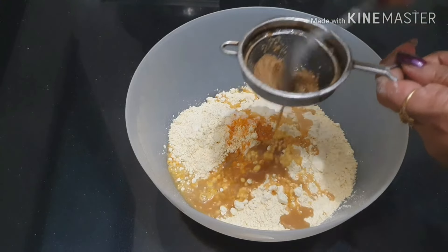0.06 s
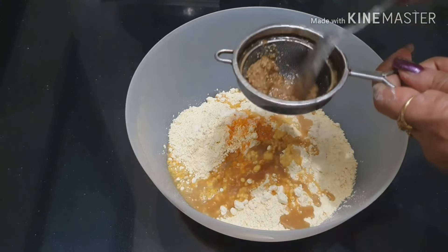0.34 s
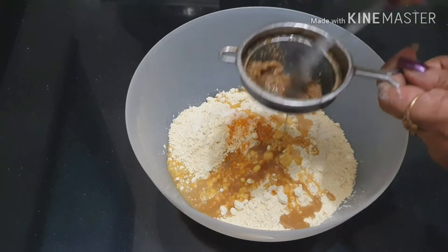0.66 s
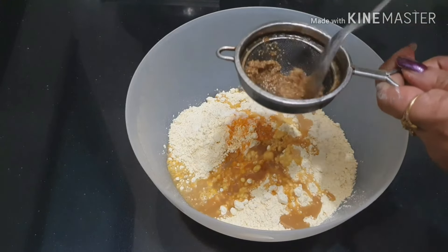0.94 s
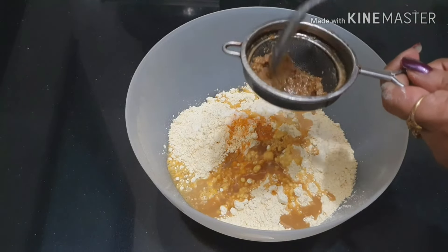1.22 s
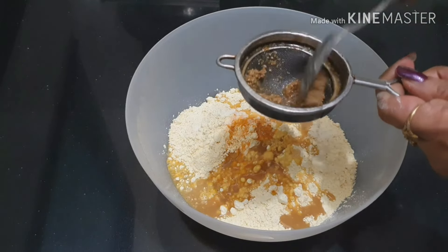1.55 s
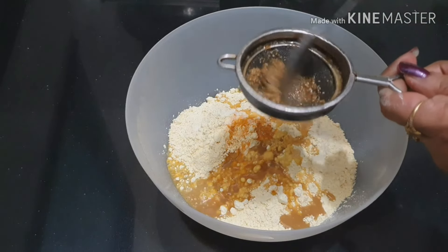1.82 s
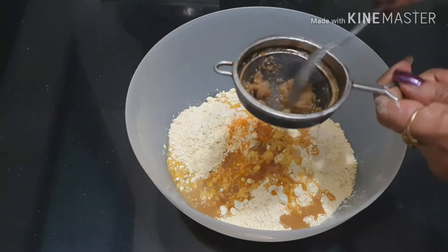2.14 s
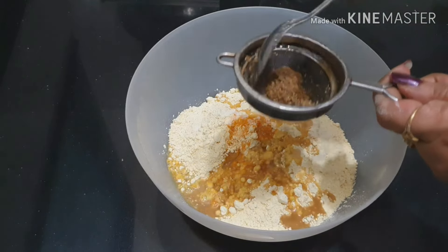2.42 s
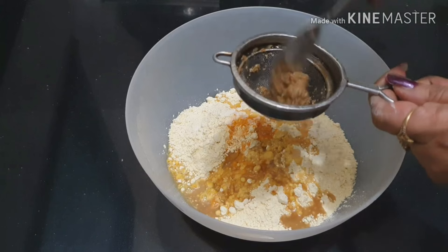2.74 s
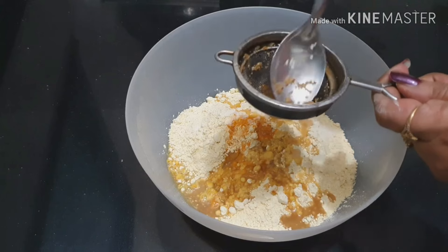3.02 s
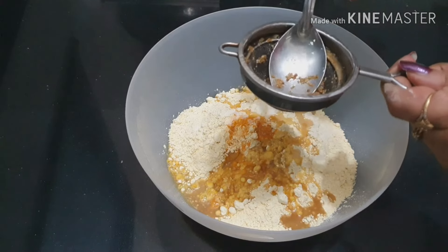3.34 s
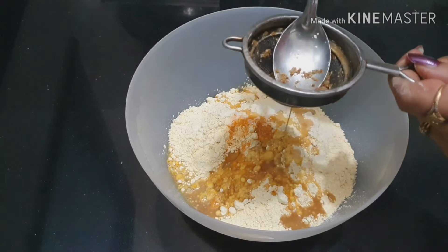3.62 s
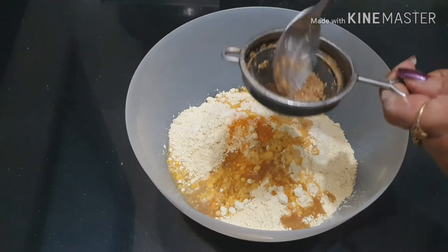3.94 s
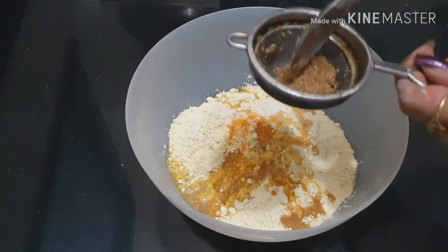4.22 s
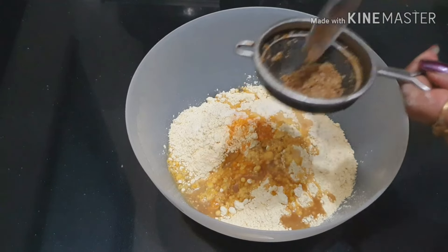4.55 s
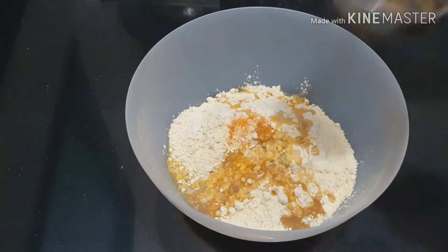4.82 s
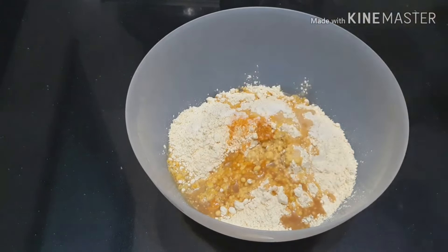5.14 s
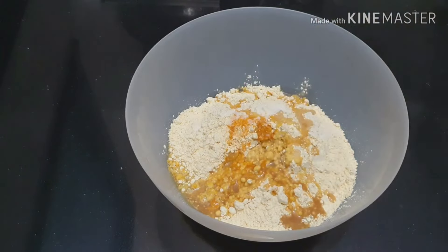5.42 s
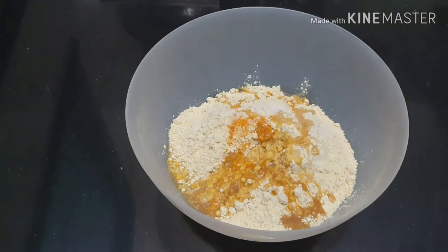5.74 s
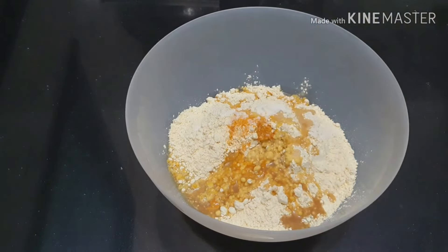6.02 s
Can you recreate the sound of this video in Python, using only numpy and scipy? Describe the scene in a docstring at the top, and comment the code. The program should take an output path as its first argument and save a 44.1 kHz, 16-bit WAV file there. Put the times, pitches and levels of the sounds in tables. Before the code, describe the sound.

A faint, low kitchen rumble and slight hiss run throughout. From the start until about 2.7 seconds, a steel spoon scrapes wet paste through a small mesh strainer in short, irregular rasps, some barely audible. Dry ticks, crackles and soft bumps of handling sound close to the microphone between 1.4 and 2.7 seconds. After a pause with only the room, the spoon taps the strainer's rim in three quick, crisp knocks with small rebounds, from 4.2 to 4.5 seconds. Faint handling follows around 5 seconds. At 5.6 seconds the strainer lands on a steel dish with a sharp clank, the loudest sound, ringing for about half a second. The spoon drops against it with a bright clink at 5.8 seconds and the strainer slides briefly, amid a cluster of close ticks and crackles ending near 6.1 seconds.

```python
"""Straining spice paste in a kitchen

A steel spoon scrapes wet paste through a small mesh strainer and is tapped clean on the rim.
The strainer is set down on a steel dish, which rings; the spoon drops against it and the strainer slides.
Dry ticks and crackles of handling sit close to the microphone, over a low room rumble."""
import sys
import numpy as np
from scipy import signal
from scipy.fft import rfft, irfft
from scipy.io import wavfile
from scipy.ndimage import uniform_filter1d

SR = 44100
rng = np.random.default_rng(int(sys.argv[2]) if len(sys.argv) > 2 else 0)


def put_to_file(sound):
    """Save the sound as 16-bit audio at rate SR, in the file named by the first command-line argument."""
    columns = np.atleast_2d(sound).T  # one column per channel
    safe = np.clip(columns, -1, 1)
    whole_steps = np.round(safe * 32767)
    wavfile.write(sys.argv[1], SR, whole_steps.astype(np.int16))


N = 276639

# Room rumble and microphone hiss. Each row: frequency in Hz, relative level in dB.
RUMBLE_COLOUR = [(20, -43.5), (29, -38.5), (38, 1), (50, 1), (90, 0.5), (160, -6), (260, -8.5), (500, -14),
                 (800, -18.5), (1100, -29), (1400, -35), (1700, -34), (2100, -53.5), (4000, -56.5)]
HISS_COLOUR = [(1000, -6.5), (2000, -1.5), (3000, -6), (4300, -6), (5100, -0.5), (9500, -1.5), (12000, -6),
               (15500, -11.5)]
# The kitchen's decay. Each row: frequency in Hz, time to fall 60 dB in seconds.
ROOM_DECAY = [(300, 0.95), (1000, 0.56), (3000, 0.45), (7000, 0.45), (14000, 0.29)]
# Reflections off counter and walls. Each row: delay in seconds, relative gain.
REFLECTIONS = [(.0021, 0.14), (.0072, .2), (.0095, 0.26), (0.0109, .25), (.015, 0.13)]
# Ticks at the microphone. Each row: start in seconds, level in dB, tilt in dB per octave.
CLOSE_TICKS = [(1.409, -40.5, -5.5), (1.4745, -25.5, -1.5), (1.579, -35.5, 4.5), (1.868, -33, -0.5),
               (1.926, -24, 6), (2.075, -46, 2), (2.543, -49, -10), (2.556, -43.5, -4.5),
               (2.582, -35, -3.5), (2.608, -39, -1), (2.636, -36, -2), (5.006, -50, -4.5),
               (5.191, -41.5, 12), (5.821, -25.5, 7), (5.845, -35, -4.5), (5.874, -33, 5),
               (5.882, -23.5, -2.5), (5.9394, -22.5, -0.5), (5.969, -30, -2), (5.988, -22.5, -4),
               (6.014, -33, 0), (6.0299, -32, 2.5), (6.036, -26.5, -1), (6.0662, -35.5, -5),
               (6.077, -35.5, -6)]
# Shifts of grip. Each row: start in seconds, length in seconds, crackle in dB, thud in dB.
GRIP_SHIFTS = [(1.437, 0.057, -60, -53.5), (1.9, 0.18, -76, -63), (2.29, 0.032, -59, -56.5),
               (2.374, 0.1, -74.5, -56), (2.46, 0.2, -65, -58), (4.857, 0.3, -72, -64.5),
               (5.127, 0.31, -80, -63.5), (5.725, .17, -51, -51.5), (5.896, 0.14, -56.5, -54)]
# Spectra of one handling tick, one blow of the spoon, one on the dish and one catch on the mesh.
# Each row: frequency in Hz, relative level in dB.
TICK_SPECTRUM = [(60, -6), (400, -7), (1000, -1), (2100, 1), (2650, -3), (3500, 3), (4400, -8), (5700, -3),
                 (6600, -5), (7500, -14.5), (8700, 0.5), (10600, -14.5), (13500, -10.5), (15500, -11)]
SPOON_CLICK = [(200, -19), (550, -20.5), (1000, -6), (1500, -2), (2700, 5), (4000, 1), (5200, -0.5),
               (7500, -7), (8800, -13), (10500, -13), (12500, -16), (15500, -15)]
LANDING_CLICK = [(200, -29.5), (700, -24), (1200, -17), (2000, 3.5), (2800, -1.5), (3500, -10), (4200, 4.5),
                 (4900, -16.5), (6200, -9.5), (7600, -20.5), (8500, -21), (9100, -32), (14000, -36.5),
                 (15200, -40.5)]
MESH_CLICK = [(150, -30), (700, 0.5), (1250, -4.5), (2050, -6.5), (2500, -5), (3300, 0.5), (4200, -0.5),
              (5100, -5.5), (6150, -18.5), (7000, -12), (9000, -19), (9650, -16), (11000, -17.5),
              (15500, -28)]
# Blows: spoon on rim, strainer on dish, spoon dropping. Each row: start in seconds, strength in dB,
# tilt in dB per octave, decay time of the contact chatter in seconds.
RIM_TAPS = [(4.1672, -22.5, -1.3, .0007), (4.2035, -33.5, -4, .0004), (4.3208, -23.5, 0, 0.00058),
            (4.3232, -22, -1.5, .0006), (4.351, -29.5, -3.5, .001), (4.3752, -32, -3, 0.0016),
            (4.5152, -18, -1.1, .001)]
DISH_LANDINGS = [(5.6102, -9.5, 0.5, 0.00099), (5.743, -32, 4, 0.00063)]
SPOON_DROPS = [(5.7685, -31, 0.5, 0.0013), (5.771, -26.5, 1.5, 0.0074), (5.853, -54, -2, 0.00086)]
# Ring of the hand-held strainer, the dish and the spoon.
# Each row: frequency in Hz, relative level in dB, time to fall 60 dB in seconds.
RIM_MODES = [(750, -17, 0.016), (1870, -31.5, 0.17), (2320, -29.5, 0.22), (2532, -9, 0.035),
             (3276, -4, 0.022), (4040, -13, 0.025), (6300, -8, 0.0094), (7700, -14, 0.024),
             (9800, -10, 0.012), (11050, -13, 0.013)]
DISH_MODES = [(1554, -34, .6), (1688, -35, .6), (1774, -35, .6), (1845, -22, .17), (2011, -22, .3),
              (2032, -29, .55), (2074, -26, .22), (2135, -28, .4), (2231, -26, .15), (2253, -21, .17),
              (2440, -31, .25), (2568, -26, .22), (2721, -31, .3), (2882, -28, .17), (3235, -33, .3),
              (3795, -40, .5), (3967, -29, .15), (4125, -32, .42), (4159, -34, .6), (4257, -28, .25),
              (4304, -34, .6), (4419, -25, .16), (5357, -26, .22), (5829, -32, .22), (6138, -27, .18),
              (6449, -37, .3), (7192, -45, .6), (9734, -31, .2), (12680, -41, .2), (14240, -41, .2)]
SPOON_MODES = [(2585, -5, .11), (3455, -16, .2), (4120, -11, .16), (4290, -12, .16), (5001, -24, .2),
               (5950, -17, .17), (7720, -18, .1), (8600, -16, .07), (9740, -17, .12), (10680, -22, .2),
               (13600, -31, .11)]
# The strainer's frame in a scrape. Each row: frequency in Hz, width in Hz, relative level in dB.
FRAME_MODES = [(1694, 170, -20), (2083, 155, -4.5), (2480, 160, -9.5), (3133, 70, -15.5), (3650, 74, -17.5),
               (3450, 97, -27), (5640, 67, -14.5), (6110, 110, -10.5), (9440, 110, -25.5), (9800, 190, -21)]
# Scrapes of the wire mesh: spoon strokes, and last the strainer sliding on the dish.
# Each row: start in seconds, rise to full pressure in seconds, level in dB,
# pitch of the rasp in Hz, its relative level in dB, tilt in dB per octave.
MESH_SCRAPES = [(-.004, 0.0083, -54.5, 2440, -5, -.5), (.092, 0.012, -59.5, 3170, 2, 1),
                (.138, .01, -59, 2160, 1, 2), (.314, 0.033, -47.5, 2900, -25, 0),
                (.662, 0.032, -44, 3630, -9, 2.5), (.732, .015, -56, 2880, 2, 2),
                (1.011, 0.025, -48, 3800, 5, 0), (1.113, 0.018, -55, 2900, 1, 1.5),
                (1.457, 0.044, -43, 3170, 2.5, .5), (1.768, 0.012, -41, 3800, 5, -.5),
                (1.818, 0.02, -47.5, 3080, 3.5, -0.5), (2.111, 0.015, -45.5, 4670, 4, 3.5),
                (2.125, 0.03, -41.5, 3260, -10, 1.5), (2.648, .002, -40.5, 3000, -3, -1.4),
                (5.85, 0.038, -43, 3700, -1, -0.5)]
# The rasp's pitch ratio at touch, at full pressure and at lift-off.
RASP_GLIDE = [1.13, 0.99, 0.86]


def amp(db):
    """Decibels to gain."""
    return 10 ** (np.asarray(db) / 20)


def unit(x):
    """Scales to an rms of one."""
    return x / np.sqrt(np.mean(x ** 2) + 1e-20)


def read(points, hz):
    """Reads a table on a log-frequency axis."""
    f, value = np.transpose(points)
    return np.interp(np.log(hz + 1), np.log(f), value)


def add(mix, start, sound):
    """Mixes a sound in at a start time in seconds."""
    at = round(start * SR)
    sound = sound[max(-at, 0):]
    part = mix[max(at, 0):][:len(sound)]
    part += sound[:len(part)]


def click(colour, tilt_db, size=2048):
    """The shortest causal pulse with a given spectrum, peak one."""
    hz = np.fft.rfftfreq(size, 1 / SR)
    octaves = np.log2(np.clip(hz, 500, 9000))
    cepstrum = irfft(np.log(amp(read(colour, hz) + tilt_db * octaves)))
    cepstrum[1:size // 2] *= 2
    cepstrum[size // 2 + 1:] = 0
    pulse = irfft(np.exp(rfft(cepstrum)))
    return pulse / abs(pulse).max()


def noise(colour):
    """Steady noise of a given spectrum, rms one."""
    gain = amp(read(colour, np.fft.rfftfreq(N, 1 / SR)))
    return unit(irfft(rfft(rng.standard_normal(N)) * gain, N))


def grains(count, per_s, spread_db):
    """Random impulses of uneven size."""
    size = amp(spread_db * np.minimum(rng.exponential(1, count), 3))
    return size * rng.choice([-1, 1], count) * (rng.random(count) < per_s / SR)


def resonate(x, hz, width_hz):
    """One resonance, steady or gliding."""
    turn = np.exp(2j * np.pi * np.cumsum(hz * np.ones(len(x))) / SR)
    return (turn * signal.lfilter([1], [1, -np.exp(-np.pi * width_hz / SR)], x / turn)).real


def room_tone():
    """The kitchen's low rumble and the microphone's own hiss."""
    return amp(-62) * noise(RUMBLE_COLOUR) + amp(-78.5) * noise(HISS_COLOUR)


def kitchen(x, echo_db, tail_db):
    """The microphone hears direct sound, near reflections, then a dense tail whose treble dies first."""
    hz, t, spectra = signal.stft(grains(SR, per_s=6000, spread_db=4), SR, nperseg=256)
    colour_db = read([(300, 6.5), (3000, -0.5), (7000, 2.5), (14000, 2.0)], hz)[:, None]
    spectra *= amp(colour_db - 60 * t / read(ROOM_DECAY, hz)[:, None])
    fade_in = np.interp(np.arange(SR) / SR, [.003, .009], [0, 1])
    tail = signal.istft(spectra, SR, nperseg=256)[1][:SR] * fade_in
    response = amp(tail_db) * tail / np.linalg.norm(tail)
    for delay, gain in REFLECTIONS:
        add(response, delay, amp(echo_db) * gain * np.array([.5, .5]))
    response[0] += 1
    return signal.fftconvolve(x, response)[:N]


def soften(x, force_db):
    """Gentle slips lack the highest treble that hard ones have."""
    hardness = np.interp(force_db, [-48, -30], [.3, 1])
    soft = signal.fftconvolve(x, signal.firwin(21, 10800, fs=SR), "same")
    return soft + hardness * (x - soft)


def ticks(hard_db=-32.5, rebound_s=.0039, rebound_db=-6.5, slip_s=.0018):
    """Stick-slip ticks close to the microphone, each trailed by tiny slips; hard ones catch twice."""
    out, t = np.zeros(N), np.arange(SR // 50) / SR
    for start, db, tilt_db in CLOSE_TICKS:
        catches = [(0, 0), (rebound_s, rebound_db)] if db > hard_db else [(0, 0)]
        for delay, drop_db in catches:
            slips = .23 * rng.standard_normal(len(t)) * np.exp(-t / slip_s)
            slips[0] = 1
            tick = signal.fftconvolve(slips, click(TICK_SPECTRUM, tilt_db))
            add(out, start + delay, -amp(db + drop_db) * soften(tick, db))
    return out


def grip_crackle(firm_db=-48.5, creep_s=.013):
    """Crackle and a soft thud swell at each tick and shift of grip; gentle crackle is sparse and dull."""
    out = np.zeros(N)
    low_noise = noise([(25, -30.5), (65, 1.0), (130, -3), (250, -14.5), (700, -23), (2000, -43.5)])
    creeps = [(start - creep_s, 2 * creep_s, db - 29, db - 30) for start, db, _ in CLOSE_TICKS]
    for start, length, db, thud_db in GRIP_SHIFTS + creeps:
        thud = unit(low_noise[round(start * SR):][:round(length * SR)])
        force_db = db - firm_db
        slips = grains(len(thud), per_s=750 * amp(.15 * force_db), spread_db=3.5)
        crackle = signal.fftconvolve(slips, click(TICK_SPECTRUM, tilt_db=.06 * force_db))[:len(thud)]
        shift = amp(db) * soften(unit(crackle), db + 12) + amp(thud_db) * thud
        add(out, start, shift * signal.windows.tukey(len(shift), .5))
    return out


def blows(rows, colour, modes, chatter, crack_db, ring_db):
    """Steel on steel: each blow gives a crack (a click with brief chatter) and a decaying ring."""
    cracks, rings, t = np.zeros(N), np.zeros(N), np.arange(SR) / SR
    for start, db, tilt_db, contact_s in rows:
        force = chatter * rng.standard_normal(SR) * np.exp(-t / contact_s)
        force[0] = 1
        crack = signal.fftconvolve(force, click(colour, tilt_db))[:SR]
        add(cracks, start, amp(db + crack_db) * crack / np.linalg.norm(crack))
        for hz, mode_db, t60 in modes:
            wave = rng.choice([-1, 1]) * np.sin(2 * np.pi * hz * t)
            onset_db = db + ring_db + mode_db + tilt_db * np.log2(hz / 3000)
            add(rings, start, amp(onset_db - 60 * t / t60) * wave)
    return cracks, rings


def spoon_drop():
    """The spoon falls against the steel; its high ring reaches the microphone direct."""
    crack, ring = blows(SPOON_DROPS, SPOON_CLICK, SPOON_MODES, chatter=.57, crack_db=15.5, ring_db=-3)
    return kitchen(crack, echo_db=-23, tail_db=-1.5) + ring


def dish_landing():
    """The strainer lands on the dish: the crack fills the room, the long ring arrives direct."""
    crack, ring = blows(DISH_LANDINGS, LANDING_CLICK, DISH_MODES, chatter=.14, crack_db=10, ring_db=-3)
    return kitchen(crack, echo_db=6, tail_db=1) + ring


def rim_taps():
    """The spoon knocks the hand-held rim: cracks spread round the room, the short ring is drier."""
    crack, ring = blows(RIM_TAPS, SPOON_CLICK, RIM_MODES, chatter=.57, crack_db=3.5, ring_db=-3.5)
    return kitchen(crack, echo_db=12, tail_db=3) + kitchen(ring, echo_db=-2, tail_db=-16)


def scraping(touch_pressure=.29, release_s=.061, cushion_s=.017):
    """Wire after wire catches in jerks on the spoon or the dish; the mesh rasps at a sinking pitch."""
    out, t = np.zeros(N), np.arange(SR // 5) / SR
    for start, rise, db, rasp_hz, rasp_db, tilt_db in MESH_SCRAPES:
        stages = [0, rise, rise + release_s]
        pressure = np.interp(t, stages, [touch_pressure, 1, 0])
        envelope = pressure ** 1.41
        jerks_db = 2.2 * unit(uniform_filter1d(rng.standard_normal(len(t)), size=140))
        catches = grains(len(t), per_s=2300, spread_db=3.5) * amp(jerks_db)
        # bare steel is brighter until the paste cushions it
        bare = unit(signal.fftconvolve(catches, click(MESH_CLICK, tilt_db + 2.5))[:len(t)])
        cushioned = unit(signal.fftconvolve(catches, click(MESH_CLICK, tilt_db))[:len(t)])
        friction = cushioned + np.exp(-t / cushion_s) * (bare - cushioned)
        rasp = unit(resonate(friction, rasp_hz * np.interp(t, stages, RASP_GLIDE), width_hz=230))
        scrape = friction + amp(rasp_db) * rasp
        for hz, width_hz, mode_db in FRAME_MODES:
            # each contact point damps and detunes the frame in its own way
            ring = unit(resonate(friction, hz * rng.uniform(.975, 1.025), width_hz))
            ring_db = mode_db + 1.5 + tilt_db * np.log2(hz / 3000) + rng.normal(0, 2.5)
            scrape += amp(ring_db) * ring
        gain = amp(db) * np.sqrt(np.mean(envelope ** 2))
        add(out, start, gain * unit(envelope * scrape))
    return out


def scene():
    """All sources sit dead centre, the handling closest; only a faint hiss differs left to right."""
    mesh = kitchen(scraping(), echo_db=-13, tail_db=-9)
    clatter = rim_taps() + dish_landing() + spoon_drop()
    background = room_tone()
    handling = kitchen(ticks() + grip_crackle(), echo_db=-22, tail_db=-18)
    mid = background + handling + clatter + mesh
    side = amp(-88) * noise([(3000, -31.0), (5000, -4.5), (9500, 2.0), (15000, -1.5)])
    return np.array([mid + side, mid - side])


def record(dry):
    """The recorder's band limit cuts the highest treble."""
    lowpass = signal.firwin(401, 15650, window=("kaiser", 8), fs=SR)
    return signal.oaconvolve(dry, lowpass[None], "same")


dry = scene()
out = record(dry)
put_to_file(out)
```